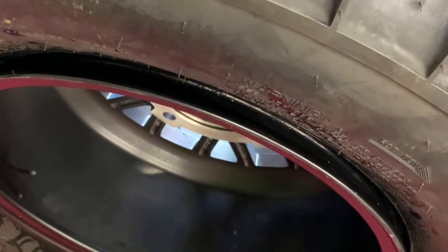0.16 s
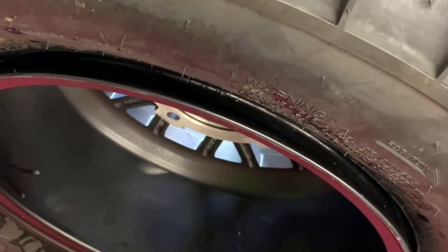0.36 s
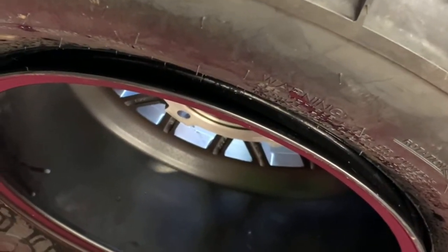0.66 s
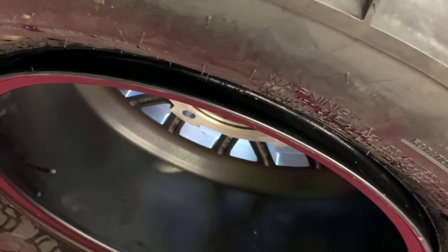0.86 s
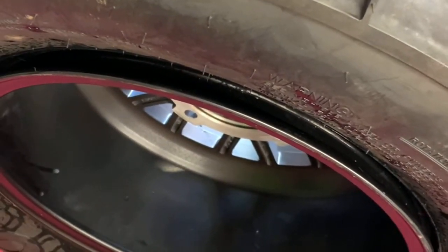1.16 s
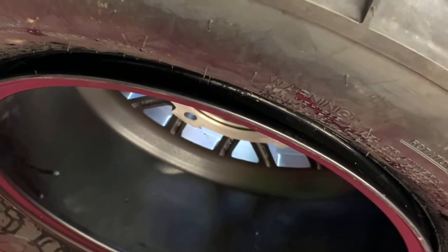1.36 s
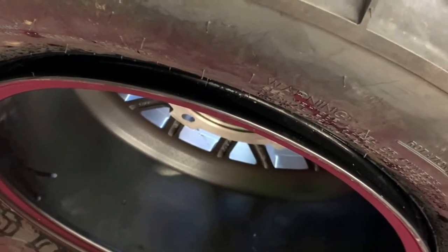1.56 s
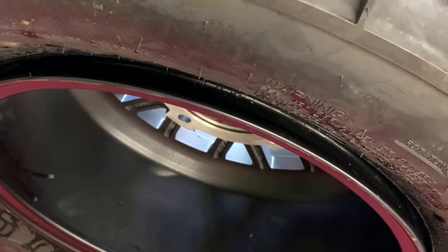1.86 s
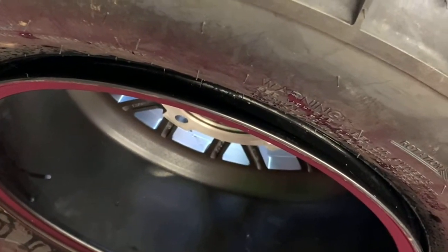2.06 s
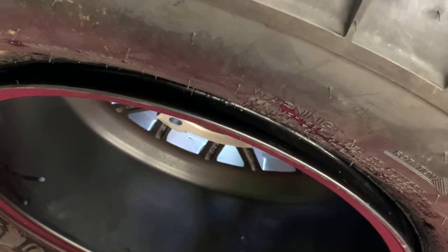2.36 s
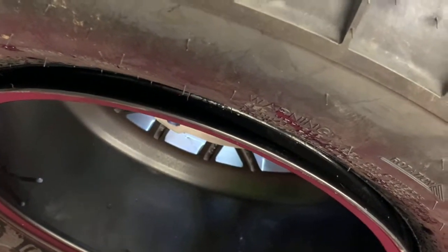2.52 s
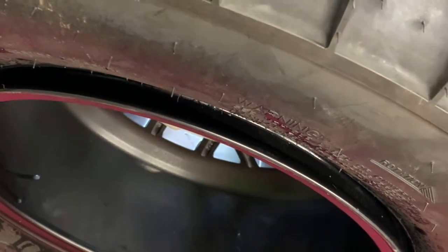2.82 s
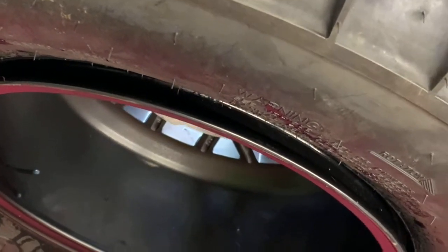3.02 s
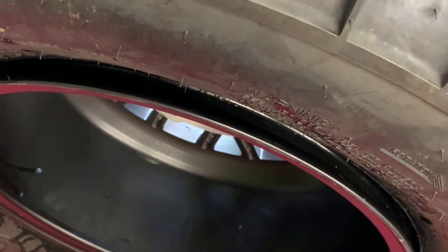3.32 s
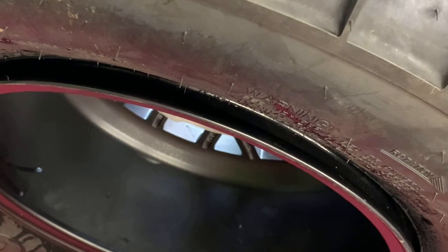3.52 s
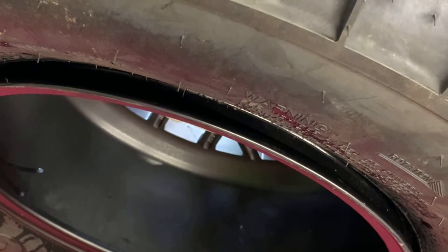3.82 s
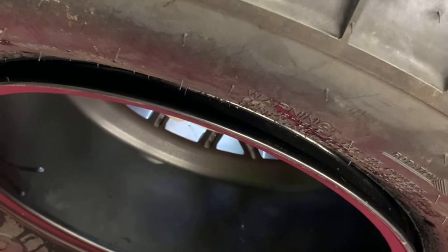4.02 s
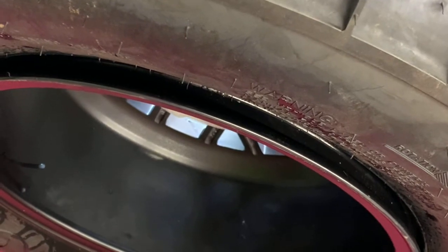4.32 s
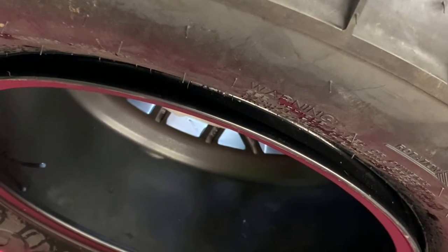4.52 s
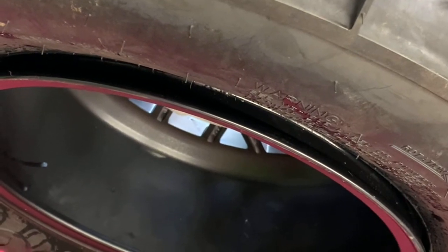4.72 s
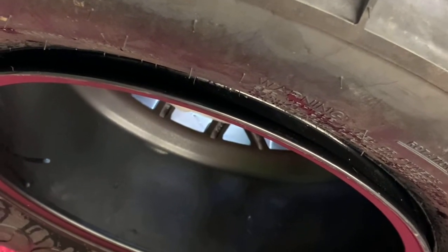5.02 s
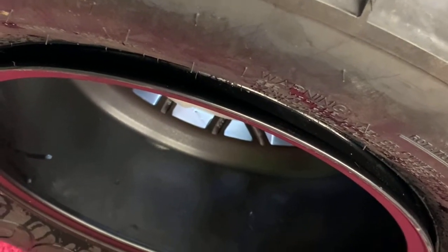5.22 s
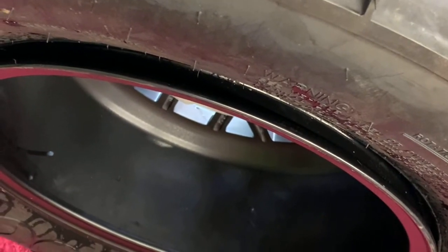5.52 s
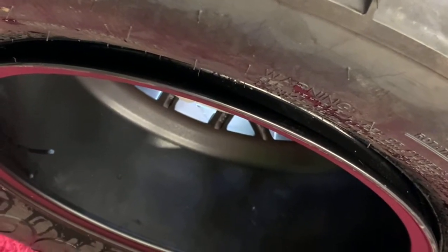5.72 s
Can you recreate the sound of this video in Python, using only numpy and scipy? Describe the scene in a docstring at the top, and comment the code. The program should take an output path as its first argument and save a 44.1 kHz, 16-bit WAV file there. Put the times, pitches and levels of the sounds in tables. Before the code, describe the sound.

Close, bright hiss of air filling a big tire, its high whistle gliding down as hollow, metallic resonances shimmer inside it.

```python
"""In a workshop, compressed air streams through the valve into a large tire, close up and in stereo.
The jet hisses and whistles from the start; the whistle sinks throughout and narrows during the first three seconds.
The air ring, tire, metal wheel and valve ring along, with single rings swelling up. After a short hold the jet
weakens while a growl grows; late on, the air stream dips twice. A low machine hum and a faint rumble lie beneath.
The stream is noise shaped over time and pitch, the body a set of resonances, the rings and hum are sines."""
import sys
import numpy as np
from scipy import signal
from scipy.fft import rfft, irfft, next_fast_len
from scipy.io import wavfile
from scipy.ndimage import uniform_filter1d, map_coordinates

SR = 44100
rng = np.random.default_rng(int(sys.argv[2]) if len(sys.argv) > 2 else 0)


def persist_wave(psi):
    """Save psi, clipped to +-1, as 16-bit WAV."""
    counts = np.round(np.clip(psi, -1, 1) * 32767).astype(np.int16)
    wavfile.write(sys.argv[1], SR, np.atleast_2d(counts).T)


N = 259308


def amp(db):
    """Amplitude factor of a level in dB."""
    return 10 ** (np.asarray(db) / 20)


def unit(x):
    """x scaled to an rms of 1."""
    return x / np.sqrt(np.mean(x ** 2) + 1e-20)


def along(points, hz):
    """Values at hz, read between (Hz, value) points on a log axis."""
    f, v = np.transpose(points)
    return np.interp(np.log(hz + 1), np.log(f + 1), v)


def wobble(rate, t):
    """A smooth random curve over t, with rate knots per unit of t."""
    knots = rng.standard_normal(int(t[-1] * rate) + 4)
    return map_coordinates(knots, [t * rate])


def filtered(x, response):
    """x times a response of frequency, padded so that ringing does not wrap round."""
    m = next_fast_len(N + SR // 2)
    spectrum = rfft(x, m) * response(np.fft.rfftfreq(m, 1 / SR))
    return irfft(spectrum, m)[..., :N]


def peak(hz, centre_hz, width_hz):
    """Power response of one resonance, 1 at its centre."""
    return 1 / (1 + (2 * (hz - centre_hz) / np.abs(width_hz)) ** 2)


def stream(patchy_db, flutter_db):
    """Two unrelated draws of turbulent air: broad jet, sinking whistle, its undertone and a lower growl."""
    # the jet's spectrum between resonances: pitch_hz, relative level_db per Hz
    jet_spectrum = [(28, -60), (45, -29), (850, -20), (1400, -20.5), (1550, -22), (1900, -14), (2250, -16),
                    (2420, -19.5), (2550, -18), (2750, -13.5), (3000, -11.5), (3250, -9.5), (3500, -5.5),
                    (4200, -8), (5200, -1.5), (6100, 0.5), (7300, -4.5), (9200, -2.5), (13500, -8),
                    (15700, -5)]
    # the sinking whistle before the tire colors it: time_s, pitch_hz, level_db (rms)
    whistle_path = [(0, 11300, -33), (0.8, 11050, -32), (1.3, 10680, -31), (2.3, 10480, -30.5),
                    (2.7, 10220, -30.5), (3.5, 10070, -30.5), (4, 9900, -31), (5, 9750, -31.5),
                    (5.5, 9650, -32.5), (5.88, 9550, -35)]
    # brief dips of the whole air stream: middle_s, length_s, depth_db
    stream_dips = [(4.587, 0.05, 1), (4.902, 0.068, 1)]
    hz, t, z = signal.stft(rng.standard_normal((2, N)), SR, nperseg=512)
    hz = hz[:, None]

    # the jet holds at first, then weakens evenly as the tire fills
    hold_s, fall_db_per_s, tilt_db_per_octave = 1.7, 0.37, -0.32
    jet_db = -29 - fall_db_per_s * np.maximum(t - hold_s, 0)
    tilt_db = tilt_db_per_octave * np.log2((hz + 50) / 5000)
    jet = unit(amp(along(jet_spectrum, hz))) * amp(jet_db + tilt_db + 0.55 * wobble(5.3, t))

    # the whistle narrows evenly, then keeps its width; it flutters on its own
    s, path_hz, path_db = np.transpose(whistle_path)
    whistle_hz = np.interp(t, s, path_hz)
    whistle_db = np.interp(t, s, path_db)
    wide_hz, narrow_hz, narrowing_from_s, narrowing_to_s = 1660, 520, 0.53, 3
    width_hz = np.interp(t, [narrowing_from_s, narrowing_to_s], [wide_hz, narrow_hz])
    # steep flanks: the resonance acts twice, its power response used as amplitude
    band = peak(hz, whistle_hz * (1 + 0.002 * wobble(10, t)), width_hz)
    flutter = flutter_db * (wobble(5.9, t) + 0.78 * wobble(29.97, t))
    whistle = band / np.sqrt(np.mean(band ** 2, axis=0)) * amp(whistle_db + flutter)

    # a broad low band grows as the pressure in the tire rises
    growl_start_db, growl_rise_db_per_s = -55, 2.5
    growl = unit(peak(hz, 3970, 1850)) * amp(growl_start_db + growl_rise_db_per_s * t)

    # a broad undertone follows the whistle about an octave below
    under = peak(hz, 0.543 * whistle_hz, 1200)
    under = under / np.sqrt(np.mean(under ** 2, axis=0)) * amp(jet_db - 12.0)

    # random patches over pitch and time, the same in both draws
    field = uniform_filter1d(rng.standard_normal(z.shape[1:]), size=5, axis=0)
    field = uniform_filter1d(field, size=6, axis=1)
    dip_db = sum(db * np.exp(-(2 * (t - middle_s) / length_s) ** 2) for middle_s, length_s, db in stream_dips)
    power = jet ** 2 + whistle ** 2 + growl ** 2 + under ** 2
    gain = np.sqrt(power) * amp(patchy_db * unit(field) - dip_db)
    return signal.istft(z * gain, SR, nperseg=512)[1][:, :N]


def body(jet, ripple_db):
    """Tire, wheel and valve lift the stream at their resonances; many weak modes add a fine ripple."""
    # all four tables, pitch_hz, width_hz, level_db over the jet:
    # the ring of air inside the tire
    air_ring = [(206, 11, 16.5), (240, 24, 4), (300, 50, 2), (385, 20, 10), (415, 22, 15), (460, 20, 6),
                (617, 16, 8), (666, 13, 12), (1152, 8, 6), (1403, 10, 16), (1740, 20, 7), (1852, 16, 7),
                (1645, 18, 8), (1719, 8, 12), (1880, 14, 5), (2085, 10, 5), (2205, 40, 8), (2638, 24, 8),
                (3918, 30, 5)]
    # the tire
    tire = [(702, 15, 13), (727, 16, 8), (786, 13, 14), (838, 10, 4), (910, 7, 14), (968, 10, 9),
            (992, 8, 18), (1052, 16, 8), (1190, 10, 16), (1209, 9, 14), (1252, 8, 13), (1237, 6, 18),
            (1297, 6, 11), (1325, 10, 18), (1341, 9, 17), (1492, 13, 16), (1606, 7, 17), (1832, 7, 14),
            (1904, 8, 13), (1923, 7, 7), (1988, 8, 4), (2165, 7, 18), (2180, 24, 8), (2285, 30, 6),
            (2308, 11, 18), (2232, 10, 7), (2335, 16, 7), (2365, 18, 5), (2685, 20, 6), (2600, 30, 5),
            (2745, 40, 8), (2800, 30, 5), (2842, 16, 9), (2902, 14, 6), (3100, 14, 3), (3335, 30, 8),
            (3385, 30, 6), (3725, 20, 5), (3784, 20, 6), (3660, 14, 4), (4097, 16, 4), (4212, 24, 4),
            (4317, 16, 3)]
    # the metal wheel
    wheel = [(4422, 12, 4), (4462, 20, 6), (4495, 20, 8), (5340, 12, 4), (6160, 14, 5), (4544, 14, 5),
             (4625, 18, 5), (4698, 14, 5), (4864, 14, 6), (5149, 16, 9), (5238, 14, 5), (5281, 14, 5),
             (5359, 12, 9), (5476, 24, 6), (6046, 30, 4), (6193, 28, 6), (6278, 20, 4), (6965, 30, 5),
             (7184, 20, 5), (7469, 40, 4), (7953, 16, 5), (9150, 14, 4), (9310, 14, 4), (9385, 16, 4),
             (9460, 14, 4), (9530, 20, 4), (9601, 20, 4), (9676, 18, 4), (9780, 16, 4), (9834, 16, 5),
             (9986, 16, 5), (10082, 12, 4), (10112, 12, 4), (10159, 16, 4), (10352, 16, 6), (10558, 16, 7),
             (9880, 14, 4), (9930, 14, 4), (10200, 14, 4), (10305, 14, 4), (10680, 20, 4), (10812, 14, 7),
             (11008, 30, 4), (11300, 20, 5), (11436, 12, 3), (11550, 14, 5)]
    # the valve
    valve = [(11870, 110, 9), (11852, 20, 10), (15300, 170, 8), (14783, 30, 4)]
    # resonances that grow or fade as the tire fills: pitch_hz, width_hz, start_level_db, end_level_db over the jet
    changing = [(1696, 8, 9, 15), (1766, 7, 7, 12), (1812, 8, 4, 10), (1960, 10, 1, 12), (2039, 8, 12, 18),
                (2466, 22, 8, 12), (2706, 10, 5, 15), (3160, 18, 2, 7), (3430, 7, 20, 9), (3539, 30, 1, 6),
                (4059, 18, 4, 9), (4172, 12, 4, 10), (5806, 14, 13, 1), (5964, 16, 10, -6),
                (6358, 14, 7, -6), (6678, 20, 9, -4)]
    # each resonance acts twice, so the valleys stay dark; the widths are those of the doubled peak
    wider = 1 / np.sqrt(np.sqrt(2) - 1)
    stages = np.linspace(0, 1, num=4)  # from start to end

    def lift(hz, modes):
        """Power that the modes add to the stream."""
        return sum(amp(2 * db) * peak(hz, c, w * wider) ** 2 for c, w, db in modes)

    def response(hz):
        """Amplitude response of the body at every stage."""
        steady = 1 + lift(hz, air_ring + tire + wheel + valve)
        moving = [lift(hz, [(c, w, a + (b - a) * u) for c, w, a, b in changing]) for u in stages]
        # a knot every 15 Hz, full depth from 4 kHz up
        ripple = amp(ripple_db * wobble(1 / 15, hz) * np.clip(hz / 4000, 0, 1))
        return (np.sqrt(steady + np.array(moving)) * ripple)[:, None]

    # cross-fade from stage to stage while the tire fills
    progress = np.linspace(0, 1, N)
    share = np.clip(1 - np.abs(progress - stages[:, None]) / stages[1], 0, 1)
    return np.sum(filtered(jet, response) * share[:, None], axis=0)


def rings(steady, waver, flutter_db):
    """Lightly damped rings kept going by the stream: a steady share of power, the rest beating like narrow noise."""
    # the strongest rings: ring, usual start_level_db (rms), rise_db_per_s, beating in random knots_per_s
    strongest = [("1st", -57.5, 0.1, 6), ("2nd", -58, -0.8, 9), ("3rd", -57, -0.1, 9),
                 ("4th", -54.5, 1.6, 14), ("5th", -45.5, 0, 13)]
    # pitch of each ring: ring to pitch_hz
    ring_pitch = {"1st": 966, "2nd": 1076, "3rd": 1385, "4th": 2737, "5th": 3364}
    # the clearest swells of single rings: ring, middle_s, length_s, added level_db (rms at the top)
    ring_swells = [("5th", 0.93, 0.16, -40), ("2nd", 0.98, 0.14, -53), ("2nd", 1.25, 0.25, -53),
                   ("5th", 1.38, 0.25, -41), ("1st", 1.5, .4, -53), ("4th", 1.75, 0.18, -48),
                   ("2nd", 1.75, 0.2, -54), ("2nd", 3.13, 0.12, -53), ("5th", 1.85, 0.2, -42),
                   ("3rd", 2.2, .2, -52), ("4th", 2.35, 0.2, -44), ("2nd", 2.6, 0.22, -47),
                   ("4th", 3.1, 0.4, -47), ("3rd", 3.8, 0.45, -50), ("5th", 4.05, 0.3, -41),
                   ("4th", 4.05, 0.3, -44), ("2nd", 4.1, 0.12, -51), ("4th", 4.72, 0.17, -36.5),
                   ("5th", 5.35, 0.25, -41), ("5th", 5.72, 0.4, -39), ("4th", 5.8, 0.2, -39.5)]
    slow_wander = 0.0004  # share of the pitch, as is waver
    t = np.arange(N) / SR
    out = np.zeros(N)
    for ring, db, rise, beats in strongest:
        usual = amp(db + rise * t)
        beating = unit(np.array([wobble(beats, t), wobble(beats, t)]))
        beating = np.sqrt(1 - steady) * usual * beating
        swell = sum(amp(top_db) * np.exp(-(2 * (t - middle_s) / length_s) ** 4)
                    for which, middle_s, length_s, top_db in ring_swells if which == ring)
        hz = ring_pitch[ring] * (1 + slow_wander * wobble(2.5, t) + waver * wobble(18, t))
        phase = 2 * np.pi * np.cumsum(hz) / SR
        held = np.sqrt(2 * (steady * usual ** 2 + swell ** 2)) * amp(flutter_db * wobble(25.1, t))
        out += (held + beating[0]) * np.sin(phase) + beating[1] * np.cos(phase)
    return out


def stereo(pair):
    """Stereo width, phase and balance by pitch: one draw goes to both sides alike, the other with opposite signs."""
    # stereo phase by pitch, left ahead of right, rising in steps: pitch_hz, phase in half turns
    stereo_phase = [(0, 0), (900, -.1), (1600, 0), (2100, .15), (2500, .05), (2740, .55), (3400, .45),
                    (4200, .76), (4320, .86), (4450, .985), (4680, 1), (4950, 1.015), (5150, 1.16),
                    (6250, 1.86), (6400, 1.99), (6950, 2.01), (7300, 2.15), (8250, 2.85), (8650, 2.99),
                    (9020, 3.01), (9250, 3.15), (10750, 3.9), (10900, 3.99), (11200, 4.01), (11700, 4.25),
                    (12400, 4.8), (12600, 4.95), (12900, 5), (13650, 5), (13800, 5.3), (14500, 5.9),
                    (15000, 6), (17000, 6)]
    # stereo width by pitch, how alike left and right are: pitch_hz, from wide (0) to narrow (1)
    stereo_width = [(50, .6), (150, .9), (330, .99), (700, .5), (1000, .78), (1600, .8), (1900, .72),
                    (2250, .8), (2600, .5), (3050, .58), (3350, .93), (3850, .76), (4400, 1), (4950, 1),
                    (5700, .87), (6350, 1), (6950, 1), (7650, .74), (8600, 1), (9150, 1), (10400, .92),
                    (10900, 1), (11250, 1), (12100, .76), (12800, 1), (13650, 1), (13800, .8), (14300, .76),
                    (15000, 1)]
    # level of left over right by pitch: pitch_hz, level_db
    balance = [(100, -.2), (600, -1), (1400, -2), (2500, -.6), (3300, 0)]
    phase_hz, half_turns = np.transpose(stereo_phase)

    def width(hz):
        """Amplitudes of the draw for the middle and the draw for the sides."""
        turn = np.arccos(np.clip(along(stereo_width, hz), 0, 1)) / 2
        return np.array([np.cos(turn), np.sin(turn)])

    def offsets(hz):
        """Half of the phase and balance goes to the left, the opposite half to the right."""
        half = np.exp(.5j * np.pi * np.interp(hz, phase_hz, half_turns)) * amp(along(balance, hz) / 2)
        return np.array([half, 1 / half])

    middle, side = filtered(pair, width)
    return filtered(np.array([middle + side, middle - side]), offsets)


def hum():
    """A distant motor: low sines sharing one pitch drift, each slightly unsteady in strength."""
    # tones of the motor: pitch_hz, level_db (rms), both before the unsteadiness
    motor_tones = [(47, -81), (56.5, -58.5), (114, -77)]
    t = np.arange(N) / SR
    drifting_s = np.cumsum(1 + 0.0038 * wobble(4.0, t)) / SR
    out = np.zeros(N)
    for hz, db in motor_tones:
        level = amp(db + 1.1 * wobble(4.02, t) + 0.76 * wobble(11, t))
        out += level * np.sqrt(2) * np.sin(2 * np.pi * hz * drifting_s)
    return out


def rumble():
    """A faint broad rumble of the workshop: noise through one wide low resonance."""
    # the rumble: centre_hz, width_hz, level_db (rms)
    room_rumble = (81, 81, -64.5)
    centre_hz, width_hz, db = room_rumble
    noise = rng.standard_normal(N)
    return amp(db) * unit(filtered(noise, lambda hz: peak(hz, centre_hz, width_hz)))


def scene():
    """The air stream through tire and wheel in stereo, over the workshop's hum and rumble."""
    jet = stream(patchy_db=.9, flutter_db=.45)
    air = body(jet, ripple_db=1.7)
    air[0] += rings(steady=.65, waver=.0012, flutter_db=1.5)  # into the middle
    return stereo(air) + hum() + rumble()


def record(dry):
    """The recorder keeps nothing above its band limit."""
    top_hz = 15760
    return filtered(dry, lambda hz: hz < top_hz)


dry = scene()
out = record(dry)
persist_wave(out)
```